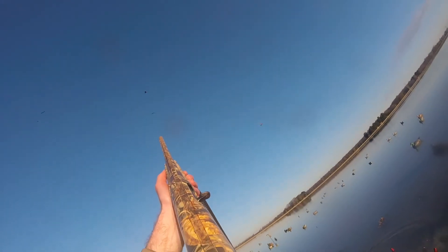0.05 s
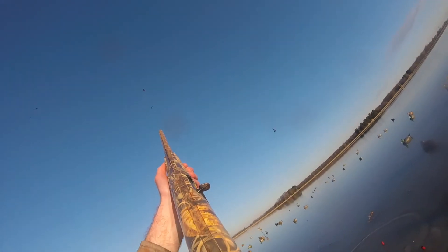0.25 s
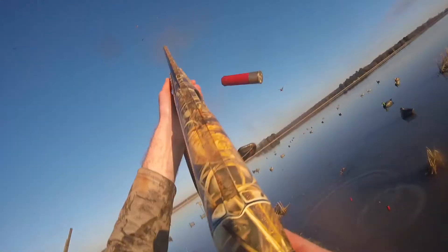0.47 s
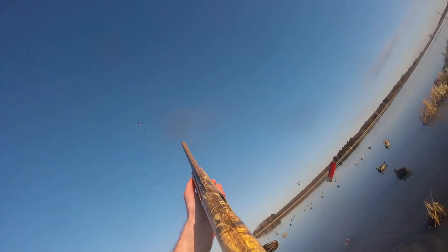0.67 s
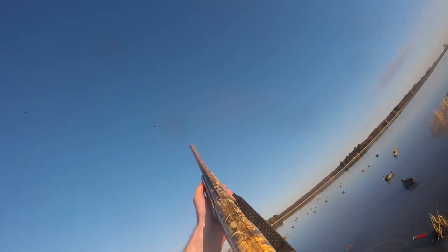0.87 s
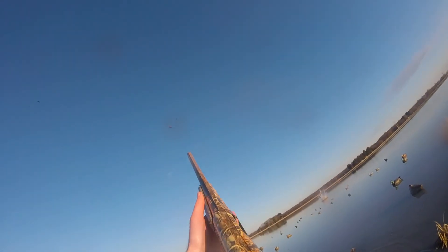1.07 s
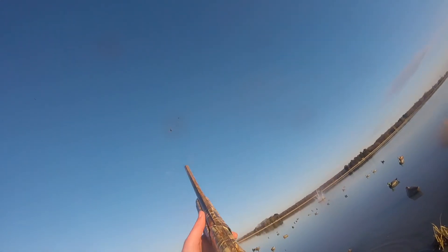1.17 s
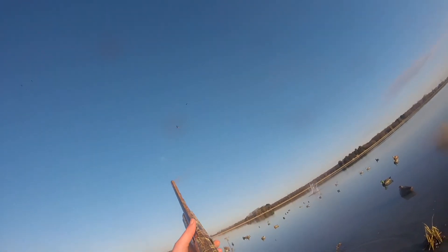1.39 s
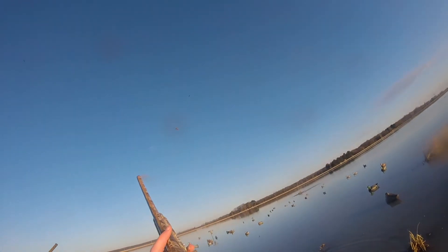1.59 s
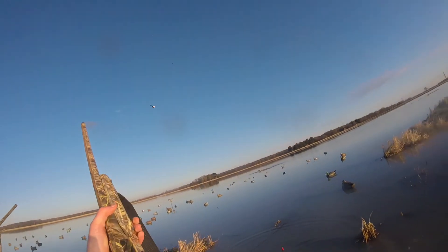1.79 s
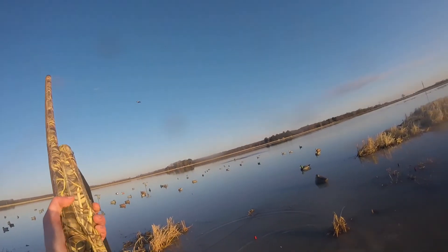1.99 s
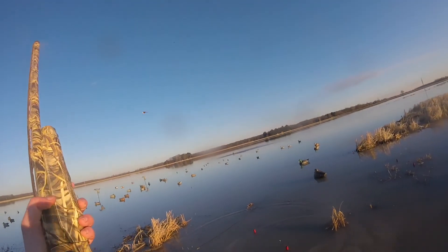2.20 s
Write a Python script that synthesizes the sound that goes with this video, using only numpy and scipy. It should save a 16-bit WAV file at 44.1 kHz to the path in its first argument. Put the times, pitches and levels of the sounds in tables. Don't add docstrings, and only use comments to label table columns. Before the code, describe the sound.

Sharp, overloaded shotgun shots with metallic action clacks, short far echoes and low wind rumble

```python
import sys
import numpy as np
from scipy import signal
from scipy.io import wavfile
from scipy.ndimage import uniform_filter1d

SR = 44100
rng = np.random.default_rng(int(sys.argv[2]) if len(sys.argv) > 2 else 0)


def to_linear_factor(level_db):
    exponent = np.asarray(level_db, float) / 20
    return 10 ** exponent


def generate_wav(sig):
    pcm = np.round(np.clip(np.atleast_2d(sig).T, -1, 1) * 32767).astype(np.int16)
    wavfile.write(sys.argv[1], SR, pcm)


N = 99225
T = np.arange(N) / SR


def rms_one(x):
    return x / np.sqrt(np.mean(x ** 2) + 1e-20)


def cut(x, hz, kind, order=2):
    return signal.sosfilt(signal.butter(order, hz, kind, fs=SR, output="sos"), x)


def drift(rate_hz):
    r = np.exp(-2 * np.pi * rate_hz / SR)
    wander = signal.lfilter([1], [1, -2 * r, r * r], rng.standard_normal(2 * N))
    return rms_one(wander[N:])


def dying(start_s, t60_s, hold_s=0.):
    falling_s = np.clip(T - start_s - hold_s, 0, None)
    return (T >= start_s) * to_linear_factor(-60 * falling_s / t60_s)


def resonate(x, table):
    out = x.copy()
    for hz, width_hz, db in table:
        r = np.exp(-np.pi * width_hz / SR)
        feed = np.array([1, 0, -1]) * (1 - r * r) / 2
        ring = [1, -2 * r * np.cos(2 * np.pi * hz / SR), r * r]
        out += to_linear_factor(db) * signal.lfilter(feed, ring, x)
    return out


# f/Hz, level/dB (per Hz)
AIR_SPECTRUM = [(60, 4.5), (130, -6), (300, -11), (700, -15.5), (1500, -22), (4000, -30.5), (8000, -33.5),
                (14000, -45.5)]


def air():
    level_db, flicker_db = -49, 2.5
    hz, db = np.transpose(AIR_SPECTRUM)
    edges = 50 * 2 ** np.arange(0, 8.6, .5)
    white = rng.standard_normal((2, N))
    out = 0
    for k, (low, high) in enumerate(zip(edges, edges[1:])):
        band_db = np.interp(np.log(low * high) / 2, np.log(hz), db)
        flicker = to_linear_factor(band_db + flicker_db * drift(30))
        out = out + flicker * cut(white[k % 2], [low, high], "band")
    return to_linear_factor(level_db) * cut(rms_one(out), 12000, "low", order=4)


# t/s, level/dB
GUSTS = [(0, -36.5), (.1, -31), (.3, -29), (0.418, -13), (0.521, -7.5), (.6, -14.5), (.7, -13), (.8, -31.5),
         (.93, -36.5), (1.0, -26.5), (1.202, -40), (1.351, -29.5), (1.49, -25.5), (1.58, -42.5),
         (1.68, -31.5), (1.798, -33.5), (1.95, -44), (2.25, -39)]


def wind():
    low_hz, high_hz = 14, 27.8
    gain_db, lump_db = 2.5, 2
    s, db = np.transpose(GUSTS)
    noise = cut(cut(rng.standard_normal(2 * N), low_hz, "high"), high_hz, "low")
    even = noise / np.sqrt(uniform_filter1d(noise ** 2, size=SR // 12) + 1e-12)
    even = cut(even, high_hz * 1.28, "low", order=3)[N:]
    return to_linear_factor(np.interp(T, s, db) + gain_db + lump_db * drift(3.8)) * even


# t/s, length/s, level/dB
ECHOES = [(.065, 0.086, -62), (.82, 0.031, -54.5), (0.925, .05, -64), (0.981, 0.015, -52), (1.0, .06, -62),
          (1.087, 0.033, -53), (1.171, 0.048, -55), (1.22, 0.038, -56), (1.277, 0.027, -62),
          (1.324, 0.034, -55), (1.375, 0.08, -63), (1.444, 0.051, -60.5), (1.548, 0.018, -59.5),
          (1.573, 0.054, -63.5), (1.647, .07, -74), (2.199, 0.027, -50.5)]
# f/Hz, width/Hz, level/dB (over the plain echo)
BANK_RINGS = [(1800, 390, 12), (2606, 140, 9.5), (3270, 110, 10.5), (4500, 430, -1.5), (5650, 246, 8)]


def echoes():
    low_hz, high_hz, fade_s = 1260, 6500, .006
    thin = cut(rng.standard_normal(N), low_hz, "high")
    noise = rms_one(cut(thin, high_hz, "low", order=4))
    shape = 0
    for s, length_s, db in ECHOES:
        fading_s = np.clip(T - s - length_s, 0, None)
        shape = shape + to_linear_factor(db) * (T >= s) * np.exp(-fading_s / fade_s)
    return resonate(shape * noise * to_linear_factor(1.2 * drift(150) - 5.5), BANK_RINGS)


# t/s, level/dB, t60/s, centre f/Hz
CLACKS = [(0.2097, -20, 0.017, 1009), (.3375, -41, 0.021, 7500), (0.3457, -34.5, 0.042, 6500),
          (0.445, -10.5, 0.043, 4500), (0.4781, -11, .012, 7000), (.479, -18.5, .05, 3300),
          (.515, -26, .1, 260), (.66, -37, .15, 250), (.4500, -2, .03, 1500), (0.5968, -16, 0.017, 2910),
          (.235, -24, .2, 85), (2.075, -29, .2, 90), (0.6037, -32, 0.0081, 4500), (0.607, -45, .02, 3500),
          (.6263, -41, 0.025, 3260), (.993, -44, .04, 330), (1.1627, -44, 0.028, 760),
          (1.1619, -47.5, 0.026, 2500), (2.0422, -22.5, .02, 893.6), (2.1477, -28.5, 0.013, 1090),
          (2.168, -32.5, 0.01, 3980), (2.112, -23, 0.014, 900), (2.202, -40, 0.11, 1500)]


def clacks():
    spread = 1.6
    noise = rng.standard_normal(N)
    out = 0
    for s, db, t60_s, hz in CLACKS:
        burst = dying(s, t60_s) * noise + 1e-18
        band = cut(burst, [hz / spread, hz * spread], "band")
        out = out + to_linear_factor(db) * np.sqrt(SR / 2 / hz) * band
    return out


# t/s, crack level/dB, crack t60/s, tail level/dB, tail t60/s
BLASTS = [
    (.2114, 6.5, 0.0045, -18.5, .27),
    (.4496, 16, 0.011, -26.5, 0.35),
    (2.0442, 7.5, .014, -20, 0.28),
]
# push level/dB, push half length/s, crack hold/s, favoured f/Hz
FRONTS = [
    (6.5, .0006, .0014, 3950),
    (4, .0005, .0024, 2950),
    (1.5, .0007, 0.002, 3300),
]


def blasts():
    crack_top_hz, crack_ring_db = 6500, 8
    thud_db, thud_t60_s, thud_hz = -6, .03, 293
    bright_db, bright_share = -1.5, 0.69
    crack, hiss = rng.standard_normal((2, N))
    crack = rms_one(cut(crack, crack_top_hz, "low"))
    dull = rms_one(cut(hiss, 2500, "low"))
    bright = rms_one(cut(cut(hiss, 9000, "low"), 7500, "low"))
    lumps_db = 1.2 * drift(120)
    out = 0
    for blast, front in zip(BLASTS, FRONTS):
        s, crack_db, crack_t60_s, tail_db, tail_t60_s = blast
        push_db, push_s, hold_s, hz = front
        u = (T - s) / push_s
        push = np.where((u > 0) & (u < 2), u - 1, 0)
        out = out + to_linear_factor(push_db) * cut(push, crack_top_hz, "low")
        thud = dying(s, thud_t60_s) * np.sin(2 * np.pi * thud_hz * (T - s))
        out = out - to_linear_factor(thud_db) * thud
        rung_crack = resonate(crack, [(hz, 500, crack_ring_db)])
        out = out + to_linear_factor(crack_db - 13.5) * dying(s, crack_t60_s, hold_s) * rung_crack
        tail = dying(s, tail_t60_s) * dull
        tail = tail + to_linear_factor(bright_db) * dying(s, tail_t60_s * bright_share) * bright
        out = out + to_linear_factor(tail_db + lumps_db) * tail
    return cut(out, 120, "high")


def jolt():
    swing_s, swing_db, rise_s, t60_s, hold_s = .5955, 10, 0.0015, 0.077, .013
    start_hz, end_hz, sag_s = 59.1, 29.6, 0.0064
    knock_s, knock_width_s, knock_hz = .5975, .0009, 1380
    knock_db, hiss_db = -2, -5.5
    after = np.clip(T - swing_s, 0, None)
    turns = end_hz * after + (start_hz - end_hz) * sag_s * (1 - np.exp(-after / sag_s))
    rise = np.exp(-.5 * (np.clip(T - swing_s, None, 0) / rise_s) ** 2)
    fall_db = 60 * np.clip(after - hold_s, 0, None) / t60_s
    swing = to_linear_factor(swing_db - fall_db) * rise * np.cos(2 * np.pi * turns)
    bell = np.exp(-.5 * ((T - knock_s) / knock_width_s) ** 2)
    tone = to_linear_factor(knock_db) * np.sin(2 * np.pi * knock_hz * (T - knock_s))
    hiss = to_linear_factor(hiss_db) * cut(rng.standard_normal(N), 6000, "low")
    return swing + bell * (tone + hiss)


def creak():
    start_s, gap_s, quicken = .655, .0058, .87
    level_db, dull_hz = -7.5, 505
    k = np.arange(8)
    slip_s = start_s + np.cumsum(gap_s * quicken ** k)
    slips = np.zeros(N)
    slips[(slip_s * SR).astype(int)] = to_linear_factor(level_db + k / 2 + rng.normal(0, 3.1, len(k)))
    dull = cut(slips + 1e-18, dull_hz, "low", order=1)
    return cut(dull, [120, 2500], "band", order=1)


# f/Hz, width/Hz, level/dB (over the direct sound)
HOUSING = [(1500, 350, 6), (2797, 360, 11.5), (3864, 500, 3.5), (4700, 700, -5.5), (5700, 440, -15.5),
           (7300, 700, -13.5)]


def scene():
    cased = 0.63
    far = air()
    through_housing = resonate(blasts() + clacks() + echoes() + cased * far, HOUSING)
    direct = (1 - cased) * far + jolt() + creak() + wind()
    return (through_housing + direct)[None]


def top_cut(x):
    return signal.sosfilt(signal.butter(12, 15660, fs=SR, output="sos"), x)


def record(dry):
    above_db, depth_db = -3, 12
    attack_s, hold_s, recover_db_per_s = 0.0063, 0.31, 14.5
    over_db = 20 * np.log10(np.abs(dry[0]) + 1e-9) - above_db
    over_db = np.clip(over_db, 0, depth_db + recover_db_per_s * hold_s)
    climb_db = recover_db_per_s * T
    duck_db = np.clip(np.maximum.accumulate(over_db + climb_db) - climb_db, 0, depth_db)
    r = np.exp(-1 / (attack_s * SR))
    x = dry * to_linear_factor(-signal.lfilter([1 - r], [1, -r], duck_db))
    return top_cut(np.clip(x, -1, 1))


dry = scene()
out = record(dry)
generate_wav(out)
```